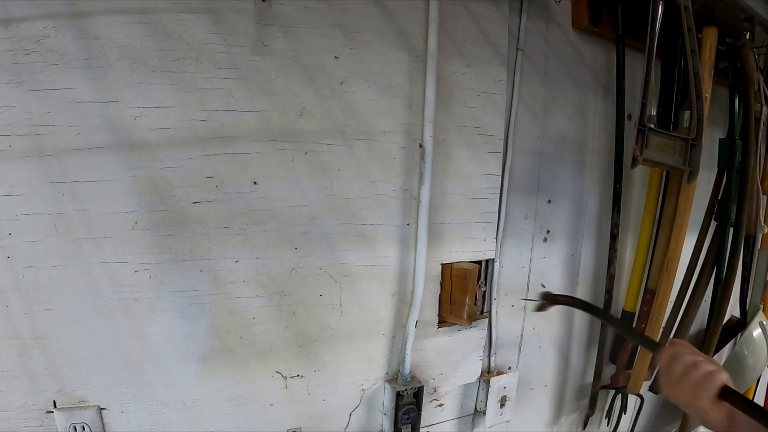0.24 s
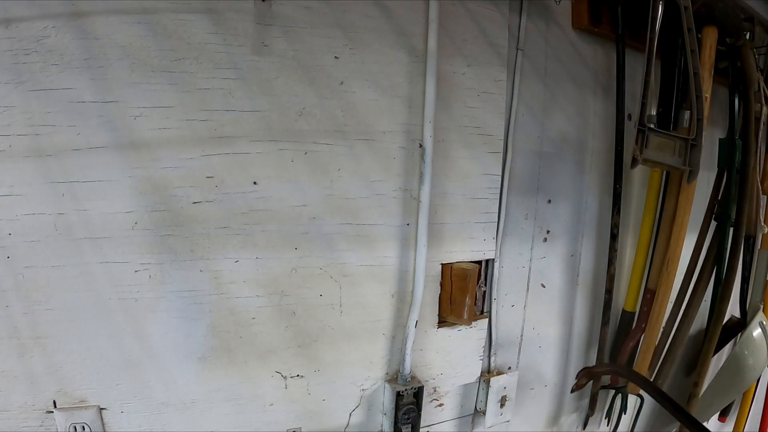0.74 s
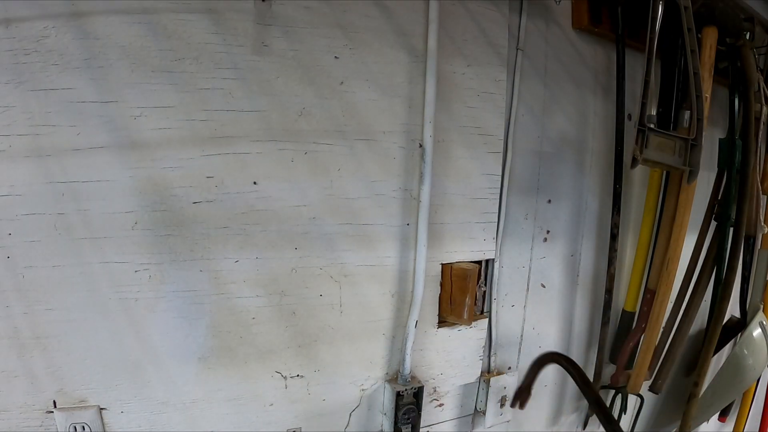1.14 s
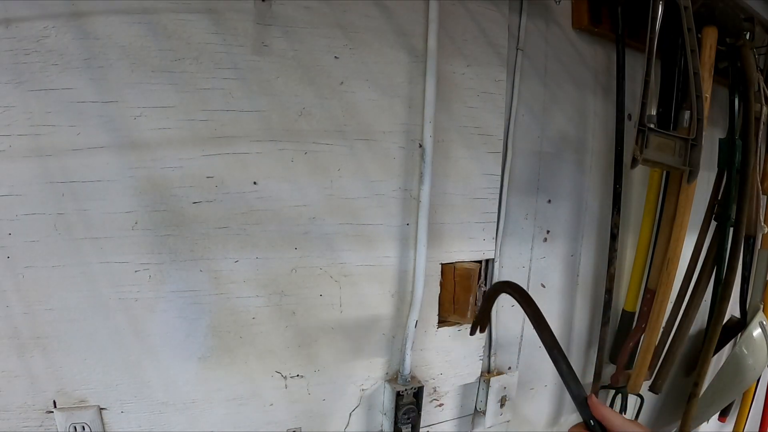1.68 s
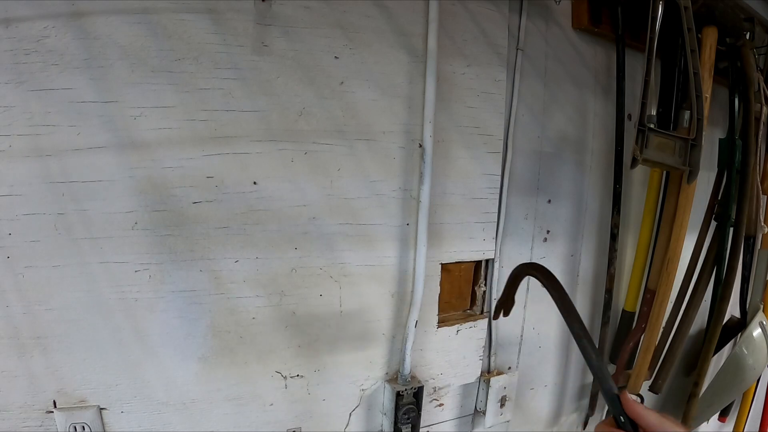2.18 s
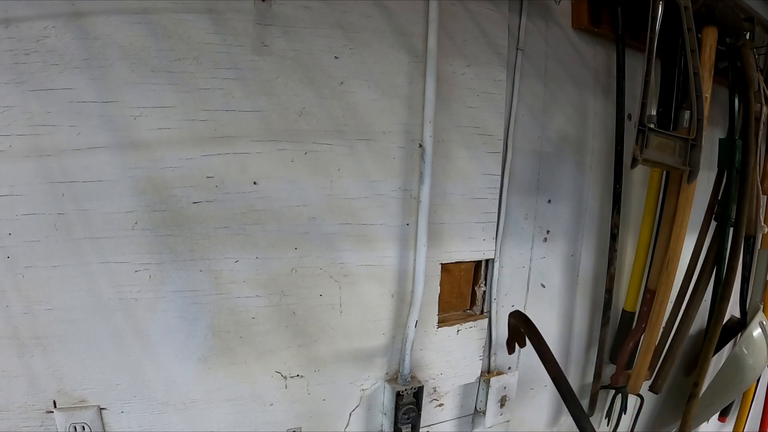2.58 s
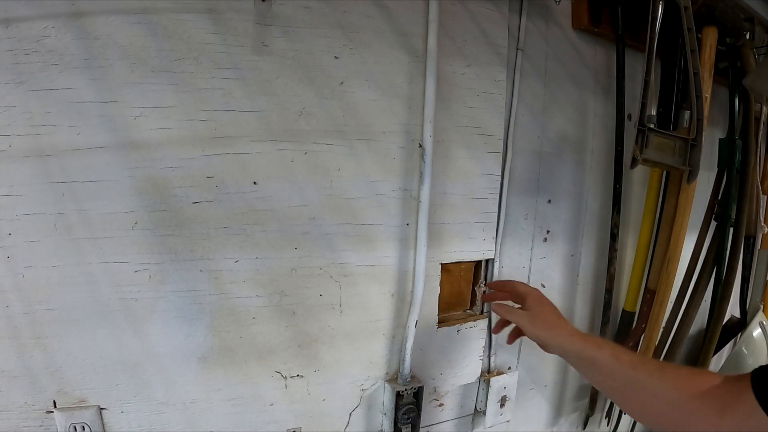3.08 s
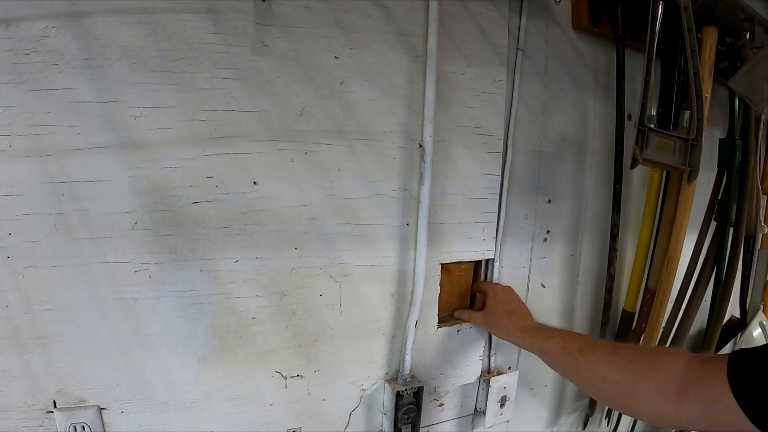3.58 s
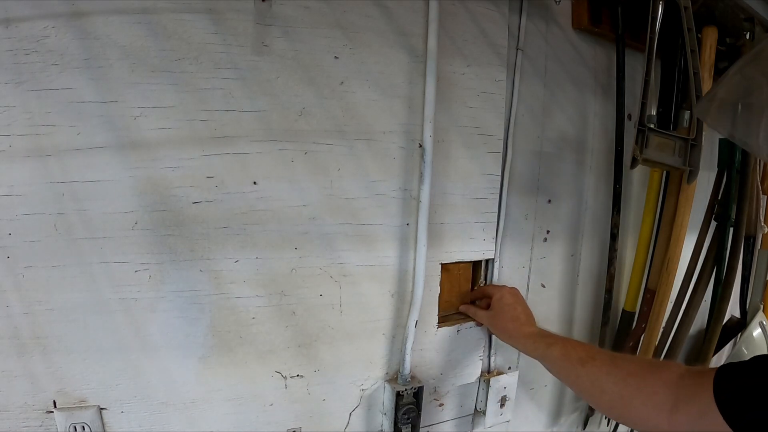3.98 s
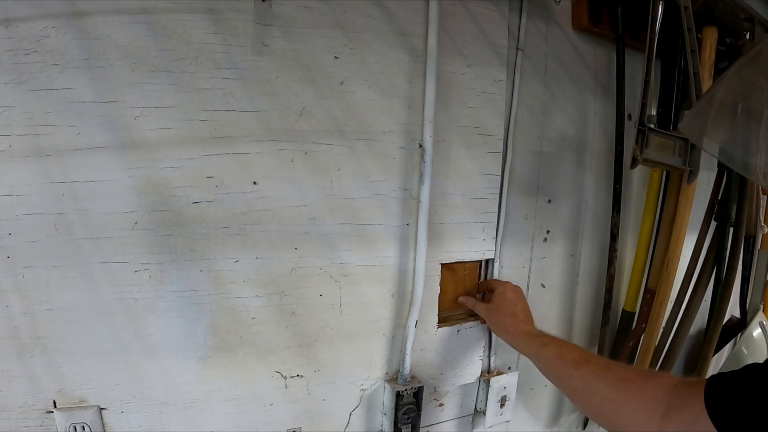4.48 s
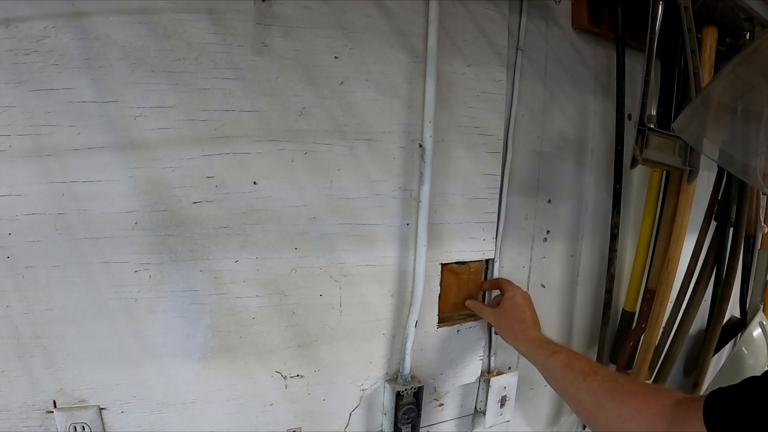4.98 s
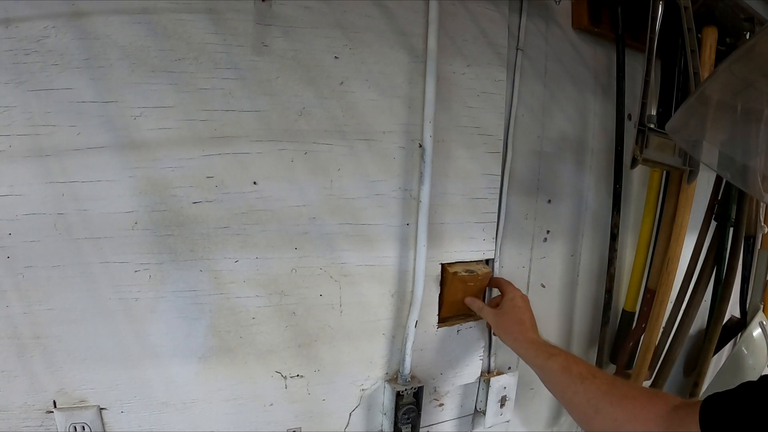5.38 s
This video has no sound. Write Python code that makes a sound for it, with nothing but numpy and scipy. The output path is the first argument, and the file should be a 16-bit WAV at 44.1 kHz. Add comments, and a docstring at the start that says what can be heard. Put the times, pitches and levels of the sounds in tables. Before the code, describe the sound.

A close, nearly mono microphone in a cluttered workshop. At the start a low heave of a plywood wall, a faint wooden scrape and tiny ticks at 0.1 s. Around 0.28-0.38 s the steel claw slips: a short, unsteady high squeal and a tight burst of loud, hollow blows, with low rumble and a room tail in which racked tools hum. At 1.0 s the bar clinks lightly with a hissing scuff; a very faint ring follows near 1.37 s. Hard, bright strikes hit the wall at 1.58 s, with a steel ring, and at 2.02 s as a quick rattling cluster. A soft slide through a palm swells at 2.8 s. From 3.3 s fingers work a loose wooden block: sparse soft knocks, strongest near 3.83 s, then busier knocks and gritty rubs at 4.2-4.7 s, a scrape at 4.9 s, and fainter taps until 5.4 s, over a quiet bass-heavy floor.

```python
"""A low heave of a plywood wall and a faint wooden scrape, then a claw slips with a squeal and a burst of blows.
Close to a nearly mono microphone, a steel pry bar clinks, then strikes the wall twice; hanging tools hum on.
Next the bar slides through a palm and fingers wiggle a loose wooden block: soft knocks, ticks and scrapes.
Contacts excite decaying wall and steel modes; rubbing and rumble are shaped noise that swells and dies away.
The contacts and rubbing sound in a cluttered workshop; the rumble and a quiet noise floor lie under them."""
import sys
import numpy as np
from scipy import signal
from scipy.fft import rfft, irfft, next_fast_len
from scipy.io import wavfile
from scipy.ndimage import uniform_filter1d

SR = 44100
rng = np.random.default_rng(int(sys.argv[2]) if len(sys.argv) > 2 else 0)


def output_pcm(signal):
    """Save a mono or channel-first signal as 16-bit PCM at the path in sys.argv[1].

    Samples are clipped to [-1, 1] before scaling.
    """
    pcm = np.clip(np.atleast_2d(signal).T, -1, 1) * 32767
    wavfile.write(sys.argv[1], SR, np.round(pcm).astype(np.int16))


N = 248709
FFT_SIZE = next_fast_len(N, real=True)


def amp(db):
    """Decibels to gain."""
    return 10 ** (np.asarray(db) / 20)


def read(points, hz):
    """Reads a table of values over frequency on a log-frequency axis."""
    f, value = np.transpose(points)
    return np.interp(np.log(hz + 1), np.log(abs(f) + 1), value)


def add(mix, start_s, sound):
    """Lays a sound into the mix at its start time."""
    part = mix[max(round(start_s * SR), 0):][:len(sound)]
    part += sound[:len(part)]


def clock(size):
    """Sample times in seconds."""
    return np.arange(size) / SR


def decay(t, t60):
    """Exponential fade that loses 60 dB in t60 seconds."""
    return np.exp(-np.log(1000) * t / t60)


def colour(x, db_of, size=16384):
    """Causal minimum-phase filter whose gain in dB is db_of(Hz), no lower than -100 dB."""
    hz = abs(np.fft.fftfreq(size, 1 / SR)) + 1
    log_gain = np.log(amp(np.maximum(db_of(hz), -100)))
    response = np.exp(np.conj(signal.hilbert(log_gain)))
    taps = np.fft.ifft(response).real[:size // 2]
    return signal.oaconvolve(x, taps)[:len(x)]


def dying(tone, t60, size, count=22):
    """Dense ringing: noise of a given colour whose bands each die at their own speed."""
    t, hz = clock(size), np.fft.rfftfreq(size, 1 / SR)
    centres = np.geomspace(50, 16000, count)
    noise = np.exp(2j * np.pi * rng.random(len(hz))) * amp(read(tone, hz))
    out = np.zeros(size)
    for centre, pick in zip(centres, np.eye(count)):
        band = irfft(noise * np.interp(hz, centres, pick), size)
        fade = decay(t, read(t60, centre))
        out += band * fade / np.sqrt(np.mean(fade ** 2))
    return out


def stream(tone, grain_db=0):
    """Steady noise of rms 1; grain_db spreads the sizes of its 32-sample grains."""
    sizes = amp(grain_db * np.minimum(rng.exponential(1, N // 32 + 1), 4)).repeat(32)[:N]
    spectrum = rfft(rng.standard_normal(N) * sizes, FFT_SIZE)
    x = irfft(spectrum * amp(read(tone, np.fft.rfftfreq(FFT_SIZE, 1 / SR))))[:N]
    return x / x.std()


def swells(rows, release_s):
    """Each movement builds up to its peak and dies away; their powers add."""
    t, power = clock(N), 0
    for peak_s, level_db, build_s in rows:
        distance = np.maximum((peak_s - t) / build_s, (t - peak_s) / release_s)
        power = power + (amp(level_db) * np.exp(-distance)) ** 2
    return np.sqrt(power)


def wall(modes_db, dense_db, size=16384):
    """One tap on the plywood: decaying sines for its big modes, dying noise for the crowd of small ones."""
    # big modes of the plywood: mode_hz, level_db, t60_s
    big_modes = [(59.5, -2, 0.031), (82, 7, 0.1), (124.7, 0.5, 0.31), (177, -8.5, 0.12), (243, 3, 0.17),
                 (298.7, 0.5, 0.16), (310.6, 2.5, 0.13), (431, -0.5, 0.13), (596, -3, 0.076), (701, 0, 0.2),
                 (897, -7, 0.24), (1106, -1, 0.078), (1280, -2, 0.17), (1612, -2, 0.055), (2016, 1.5, .04)]
    # tone of the crowded small modes: frequency_hz, level_db
    small_tone = [(30, -11), (70, -4.5), (170, -10), (350, -6), (700, -9), (1200, -4), (1600, -5),
                  (2100, -4.5), (2600, -5.5), (4800, -4), (6800, 4.5), (9000, -2), (12000, -6.5),
                  (16000, -8)]
    # how long the small modes ring: frequency_hz, t60_s
    small_t60 = [(60, 0.39), (300, 0.14), (1200, .07), (3500, 0.081), (8000, 0.026), (16000, 0.012)]
    t, out = clock(size), amp(dense_db) * dying(small_tone, small_t60, size)
    for k, (hz, level_db, t60) in enumerate(big_modes):
        rate = np.log(1000) / t60
        gain = (-1) ** k * amp(level_db + modes_db) * 2 * rate / SR  # signs alternate
        out += gain * np.exp(-rate * t) * np.sin(2 * np.pi * hz * t)
    return out


def blows(bass_share=0.085, slope=5.2):
    """The bar pushes the wall, the shorter the contact the brighter; the hard steel adds an even crack."""
    # hard blows of the bar on the wall: start_s, push_db, contact_s, crack_db
    strikes = [(0.2832, 36.5, 0.0026, -13.5), (0.2877, 30, 0.0015, 6), (0.3167, 29.5, 0.0024, 9.5),
               (0.3313, 26, .0009, -3.5), (0.35, 24, .0019, -1), (0.377, 23, .002, -11.5),
               (1.581, 30, 0.00067, 11), (1.585, 40.5, 0.0014, 1.5), (2.021, 35, 0.00068, 8.5),
               (2.0253, 31.5, 0.0011, 7.5), (2.040, 30, 0.0012, -10), (2.0439, 28.5, 0.00072, -9),
               (2.055, 34, 0.0035, -24)]
    out = np.zeros(N)
    for start_s, push_db, contact_s, crack_db in strikes:
        def force_db(f):
            cycles = f * contact_s  # the push drives a band from bass_share up to 1 cycle per contact
            push = amp(push_db) ** 2 / (1 + (bass_share / cycles) ** 2) / (1 + cycles ** slope)
            return 10 * np.log10(push + amp(crack_db) ** 2)

        add(out, start_s, colour(wall(modes_db=-2.5, dense_db=0.5), force_db))
    return out


def squeals(rise_s=0.0011):
    """Fast, unsteady stick and slip of the claw on a nail: harmonics on a wandering pitch."""
    # steel squealing on a nail: start_s, level_db, pitch_hz, t60_s, unsteadiness (share of pitch)
    slips = [(0.287, -18.5, 3810, 0.063, 0.067), (0.3165, -10.5, 3446, 0.03, 0.065),
             (0.3208, -10.5, 3382, .045, 0.074)]
    # harmonics 1 to 4 of the squeal: level_db
    harmonics = [-5.5, -3.5, -8.5, -16]
    out, t = np.zeros(N), clock(size=6000)
    for start_s, level_db, pitch_hz, t60, unsteady in slips:
        wobble = uniform_filter1d(rng.standard_normal(len(t)), size=56)
        turns = np.cumsum(pitch_hz * (1 + unsteady * wobble / wobble.std())) / SR
        tone = np.zeros(len(t))
        for k, part_db in enumerate(harmonics, 1):
            tone += amp(part_db) * np.sin(2 * np.pi * k * turns)
        add(out, start_s, amp(level_db) * tone * (1 - np.exp(-t / rise_s)) * decay(t, t60))
    return out


def ring(modes, size, count=6):
    """Struck steel: every resonance is a cluster of close partials that beat."""
    t, out = clock(size), np.zeros(size)
    for hz, width_hz, level_db, t60 in modes:
        partials = hz + width_hz * ((np.arange(count) + rng.random(count)) / count - .5)
        phases = np.outer(partials, t) + rng.random((count, 1))
        fade = decay(t, t60)
        cluster = np.sin(2 * np.pi * phases).sum(0) * fade
        # the cluster carries the energy of a single dying sine
        out += amp(level_db) * cluster * np.linalg.norm(fade) / np.linalg.norm(cluster) / np.sqrt(2)
    return out


def clinks():
    """The nail and the bar ring; where the bar is touched decides which of its modes speak."""
    # the claw tapping a nail: start_s, level_db
    nail_taps = [(0.1296, -37.5), (0.1527, -38), (0.3163, -31)]
    # ringing of the nail: mode_hz, width_hz, level_db, t60_s
    nail_modes = [(2150, 300, -17, .04), (3450, 360, -12, .03), (4520, 240, -0.5, 0.03),
                  (6740, 400, -7, .04), (4740, 38, -28, 1.6)]
    # clinks of the bar: start_s, level_db, centre_hz, spread_octaves
    bar_taps = [(1.0136, -43, 5973, 1.0), (1.368, -49, 6080, .015), (1.581, -24.5, 7113, 0.14)]
    # ringing of the steel bar: mode_hz, width_hz, level_db, t60_s
    bar_modes = [(4880, 260, 1.5, 0.069), (5950, 320, -9.5, .18), (6100, 22, -12.5, 0.58),
                 (6700, 870, -7, 0.12), (7280, 400, -4, 0.16)]
    out = np.zeros(N)
    for start_s, level_db in nail_taps:
        add(out, start_s, amp(level_db) * ring(nail_modes, size=SR))
    for start_s, level_db, centre_hz, spread in bar_taps:
        reached = []
        for hz, width_hz, mode_db, t60 in bar_modes:
            loss_db = 20 * np.log10(1 + (np.log2(hz / centre_hz) / spread) ** 2)
            reached.append((hz, width_hz, mode_db - loss_db, t60))
        add(out, start_s, amp(level_db) * ring(reached, size=SR))
    return out


def knocks(slope=11.0, low_slope=12.0):
    """Finger-light contacts last longer, so they leave the wall's treble still."""
    # soft knocks of the loose block: start_s, level_db, contact_s
    touches = [(0.106, -3.5, .00075), (0.256, 4.5, 0.00094), (0.272, 11.5, 0.0014), (1.015, -7, 0.0009),
               (3.313, -3, .0028), (3.3392, -5.5, 0.00045), (3.345, 9, .0011), (3.448, -4, 0.0023),
               (3.627, -6.5, 0.0035), (3.8273, -8, 0.00051), (3.829, 7.5, .0013), (3.861, 5.5, 0.0009),
               (4.237, -3, 0.0019), (4.251, 8.5, 0.0033), (4.3373, -0.5, 0.0012), (4.392, 3.5, 0.0032),
               (4.421, 4, 0.0032), (4.471, -3, 0.0021), (4.514, -14, 0.00054), (4.519, -1, .0025),
               (4.605, 8.5, 0.0022), (4.637, 4, 0.0012), (4.664, 3, 0.0027), (4.711, 4, 0.0012),
               (5.044, -9, 0.0027), (5.115, -20.5, 0.00064), (5.243, 1.5, 0.0037), (5.414, -6.5, 0.0029)]
    out = np.zeros(N)
    for start_s, level_db, contact_s in touches:
        low_hz = 105 * (.003 / contact_s) ** 0.47  # lower edge: 105 Hz at 3 ms, higher when shorter

        def touch_db(f):
            low_loss = 1 + (low_hz / f) ** low_slope
            high_loss = (1 + (f * contact_s) ** 2) * (1 + (f * contact_s) ** slope)
            return level_db - 10 * np.log10(low_loss * high_loss)

        tap = wall(modes_db=-3, dense_db=2.0, size=8192)
        add(out, start_s, colour(tap, touch_db, size=4096))
    return out


def burst(level_db, hz, t60, skirt_db=6, narrow_hz=11000, narrowing=9):
    """Dying noise round one resonance, a narrow one for the finest fibres."""
    t = clock(size=6000)
    noise = rng.standard_normal(len(t)) * decay(t, t60)
    skirt = skirt_db * (1 + narrowing * (hz / narrow_hz) ** 8)  # dB per squared octave
    return colour(noise / np.linalg.norm(noise),
                  lambda f: level_db - np.minimum(skirt * np.log2(f / hz) ** 2, 40))


def ticks(tick_t60=.028):
    """Tiny fractures all die equally fast; scuffs hiss on longer."""
    # dry ticks of splinters and edges: start_s, level_db, centre_hz
    fractures = [(0.1014, -15.5, 2700), (0.153, -25, 4700), (1.175, -26.5, 3530), (1.3626, -29.5, 3960),
                 (1.5459, -29, 2790), (2.8256, -27, 8020), (3.312, -32.5, 5990), (3.6311, -35.5, 3990),
                 (3.9687, -34, 7520), (4.254, -30.5, 2500), (4.4175, -26, 4200), (4.5143, -29.5, 3490),
                 (4.6016, -33, 5020), (4.632, -32, 4460), (4.911, -21.5, 6400), (4.9357, -28.5, 2800),
                 (5.002, -34, 5985), (5.3491, -37, 7970)]
    # brief hissing scuffs of steel and fingertips: start_s, level_db, centre_hz, t60_s
    scuffs = [(1.014, -17.5, 5350, 0.28), (1.0147, -25.5, 14200, 0.13), (5.115, -27, 13240, 0.246)]
    out = np.zeros(N)
    for start_s, level_db, hz in fractures:
        add(out, start_s, burst(level_db, hz, tick_t60))
    for start_s, level_db, hz, t60 in scuffs:
        add(out, start_s, burst(level_db, hz, t60))
    return out


def friction():
    """Steel slides smoothly through the palm; the block rubs grittily in its hole: swelling grainy noise."""
    # the bar sliding through the palm: peak_s, level_db, build_s
    slide = [(2.83, -58, .075)]
    # tone of the slide: frequency_hz, level_db
    slide_tone = [(300, 0), (1500, 1.5), (3000, -1), (5500, -1), (8000, 1), (11000, -9), (16000, -3.5)]
    # wood rubbing on wood, each stroke building until the block catches: peak_s, level_db, build_s
    rub = [(0.09, -61, .1), (0.28, -62, 0.017), (4.5, -61.5, 0.029), (4.585, -62, 0.021),
           (4.64, -64.5, .04), (4.905, -59, 0.046), (4.985, -68.5, .05), (5.29, -77.5, .2)]
    # tone of the rub: frequency_hz, level_db
    rub_tone = [(200, 4), (1200, -1), (2300, 5.5), (3500, -3), (4150, 3), (4900, -5.5), (7400, -3),
                (8200, 1), (9000, -11.5), (11000, -16), (16000, -17.5)]
    palm = swells(slide, release_s=0.16) * stream(slide_tone, grain_db=1.5)
    block = swells(rub, release_s=0.018) * stream(rub_tone, grain_db=2.5)
    return palm + block


def rumble():
    """The wall heaves under the lever and the blows: swelling low noise."""
    # low heaves of the wall: peak_s, level_db, build_s
    flex = [(0.03, -43.5, 0.3), (0.34, -33.5, 0.058), (0.9, -59, 0.13), (1.61, -43.5, 0.034),
            (2.05, -64, .05)]
    # tone of the heaves: frequency_hz, level_db
    flex_tone = [(12, -5), (26, 7), (42, -6), (80, 0.5), (125, -9), (200, -14.5), (500, -22), (1500, -50)]
    return swells(flex, release_s=0.12) * stream(flex_tone)


def workshop(x, build_s=0.013, rack_t60=3.0, treble_hz=1800, treble_scatter=6.0):
    """The room's diffuse tail, where clutter scatters the treble most, and the long hum of racked tools."""
    # hum of the tools on the rack: frequency_hz, level_db
    rack_tone = [(100, -42.5), (250, -41), (302, -26), (345, -40), (398, -19), (450, -40), (780, -37),
                 (900, -21), (1050, -36), (2200, -33.5), (6000, -40.5), (12000, -54.5)]
    # tone of the room's tail: frequency_hz, level_db
    room_tone = [(40, -12), (90, -8), (160, -8), (300, -10), (700, -7), (1400, -8.5), (3000, -7.5),
                 (6500, -10.5), (10000, -10.5), (16000, -14.5)]
    # how long the room rings: frequency_hz, t60_s
    room_t60 = [(60, 0.52), (250, 0.73), (1000, 0.71), (3000, 0.77), (6500, 0.71), (10000, 0.5),
                (16000, 0.43)]
    hum = dying(rack_tone, [(1000, rack_t60)], size=2 * SR, count=1)  # one decay at all pitches
    out = x + signal.oaconvolve(x, hum)[:N]
    bass = signal.sosfilt(signal.butter(4, treble_hz, "low", fs=SR, output="sos"), x)
    treble = signal.sosfilt(signal.butter(4, treble_hz, "high", fs=SR, output="sos"), x)
    for rate_hz in (14, 41):
        for path in (np.sin, np.cos):  # sound takes ever-changing paths round the clutter
            angle = 2 * np.pi * rate_hz * clock(N)
            tail = dying(room_tone, room_t60, size=SR) * (1 - np.exp(-clock(size=SR) / build_s))
            scattered = bass * path(angle) + treble * path(treble_scatter * angle)
            out += signal.oaconvolve(scattered / np.sqrt(2), tail)[:N]
    return out


def background(level_db=-65):
    """A quiet, steady noise floor, heaviest in the bass."""
    # tone of the floor: frequency_hz, level_db
    floor_tone = [(12, -5.5), (40, 0), (70, -8), (120, -7), (200, -13), (330, -10.5), (500, -18),
                  (1000, -19), (3000, -26.5), (8000, -30.5), (16000, -35.5)]
    return amp(level_db) * stream(floor_tone)


def ports(mid, side_db=-20, side_hz=5500):
    """The two microphone ports differ only a little, in the treble, by a quarter-turned side signal."""
    hz = np.fft.rfftfreq(FFT_SIZE, 1 / SR)
    treble = (hz / np.hypot(hz, side_hz)) ** 2.0
    side = amp(side_db) * irfft(1j * rfft(mid, FFT_SIZE) * treble)[:N]
    return np.array([mid + side, mid - side])


def scene():
    """All contacts sound in the room, over the rumble of the flexing wall and a quiet floor."""
    near = blows() + squeals() + clinks() + knocks() + ticks() + friction()
    return ports(workshop(near) + rumble() + background())


def record(dry, edge_hz=16100):
    """The loudest peaks round off at full scale; then the band is limited at edge_hz."""
    rounded = dry / (1 + dry ** 6) ** (1 / 6)
    lowpass = signal.firwin(255, edge_hz, window=("kaiser", 9), fs=SR)
    return signal.oaconvolve(rounded, lowpass[None], "same")


dry = scene()
out = record(dry)
output_pcm(out)
```